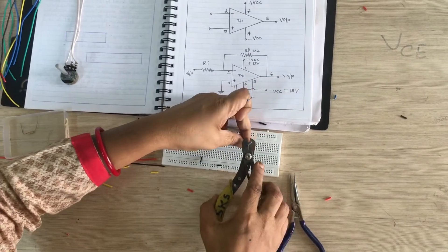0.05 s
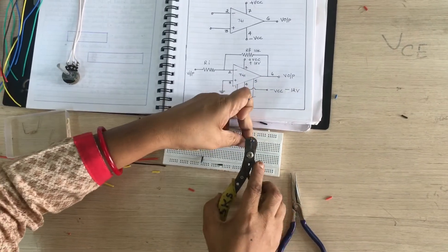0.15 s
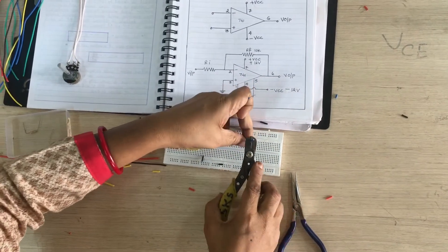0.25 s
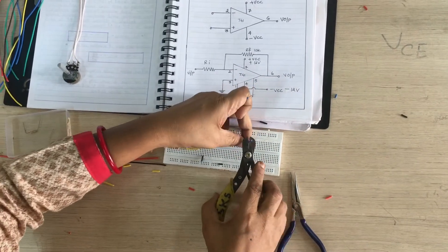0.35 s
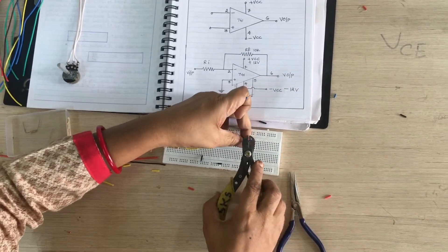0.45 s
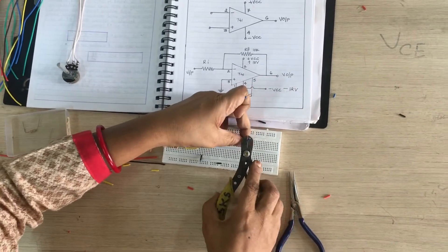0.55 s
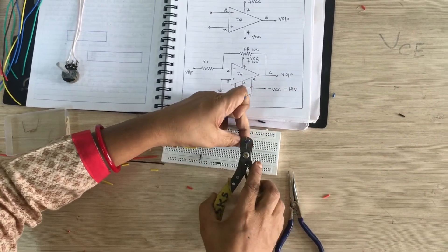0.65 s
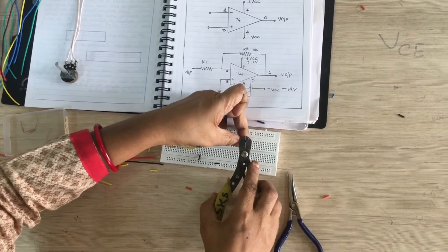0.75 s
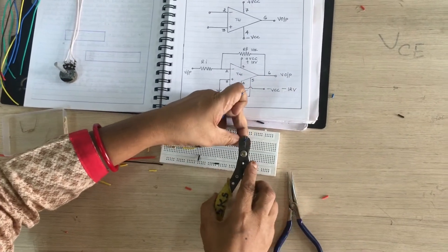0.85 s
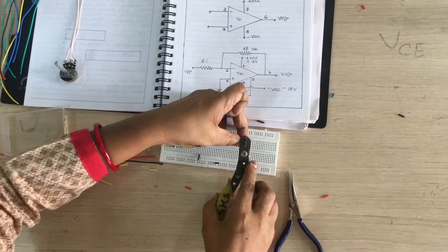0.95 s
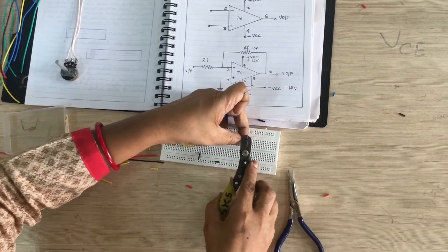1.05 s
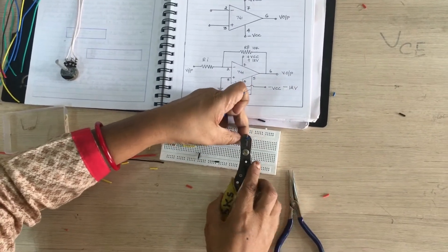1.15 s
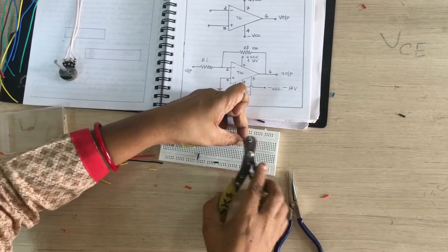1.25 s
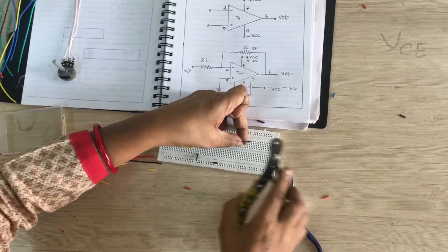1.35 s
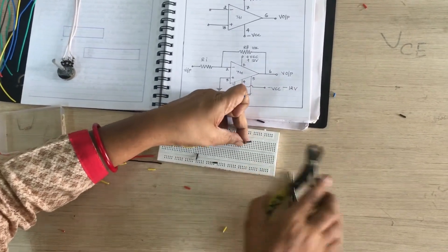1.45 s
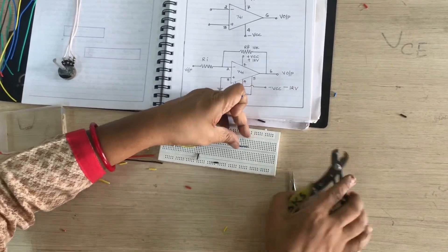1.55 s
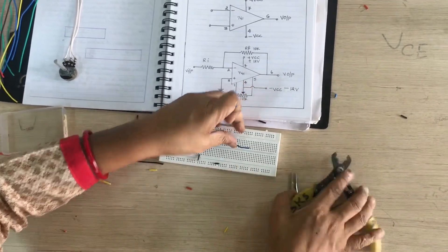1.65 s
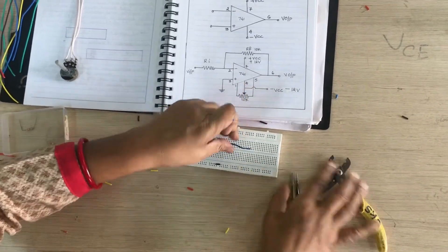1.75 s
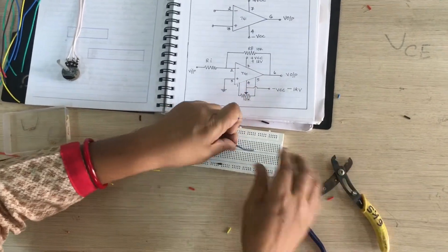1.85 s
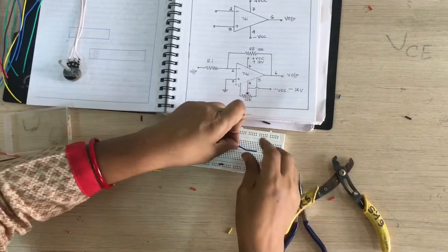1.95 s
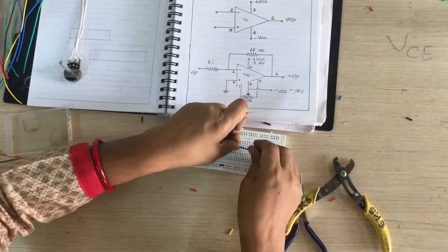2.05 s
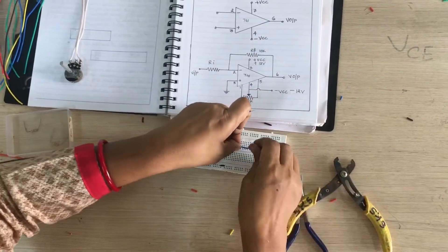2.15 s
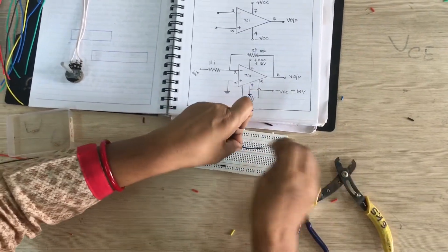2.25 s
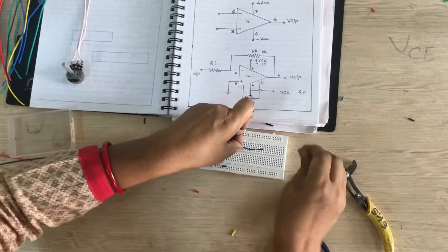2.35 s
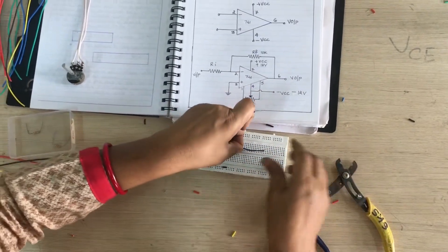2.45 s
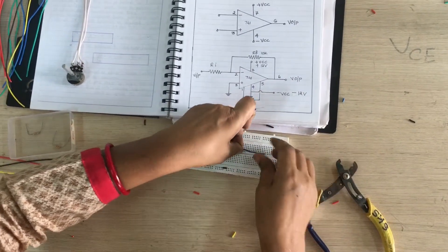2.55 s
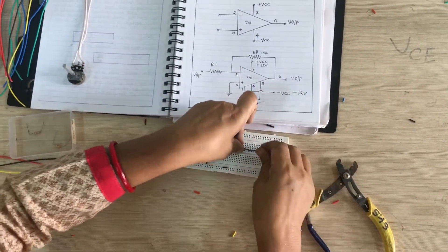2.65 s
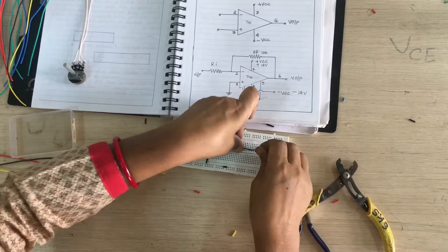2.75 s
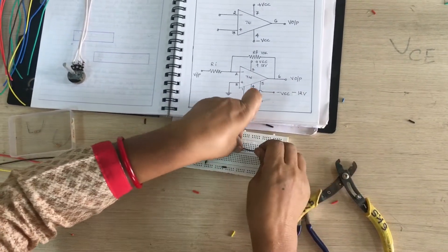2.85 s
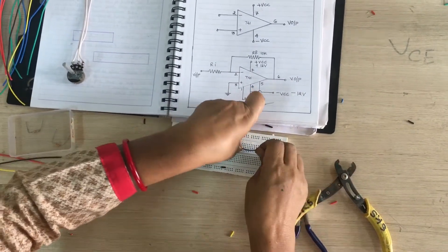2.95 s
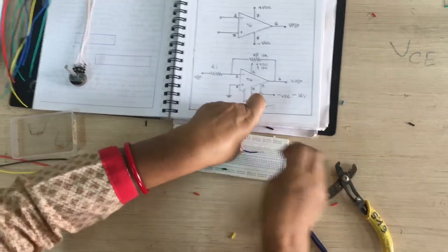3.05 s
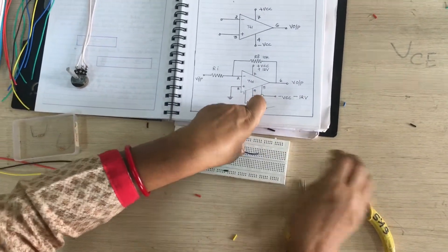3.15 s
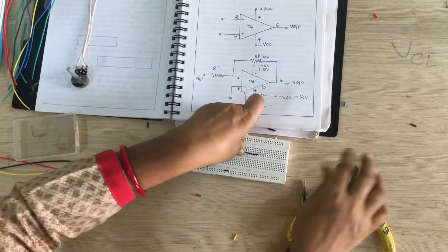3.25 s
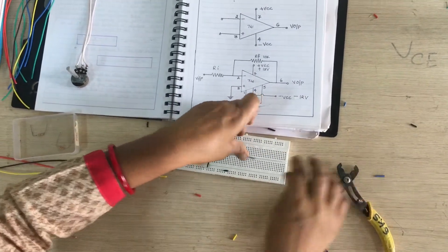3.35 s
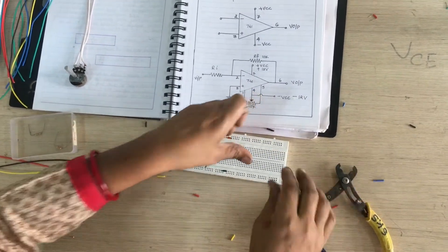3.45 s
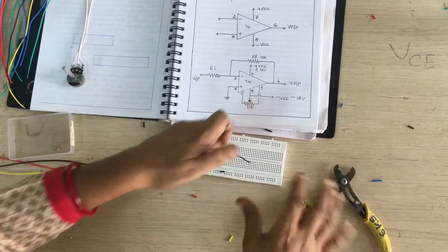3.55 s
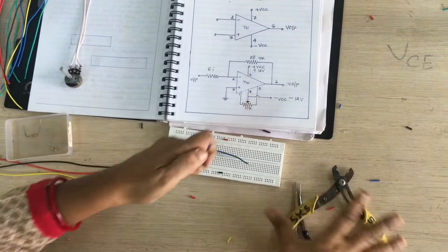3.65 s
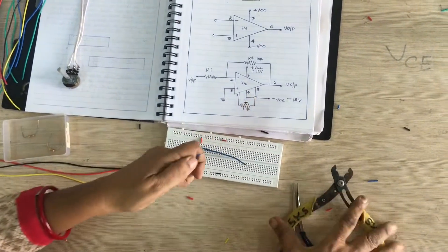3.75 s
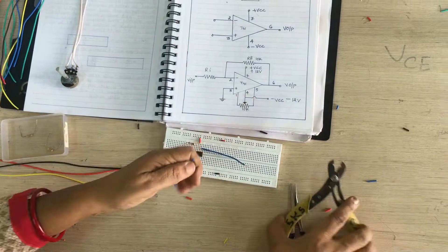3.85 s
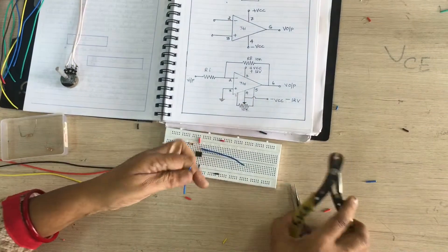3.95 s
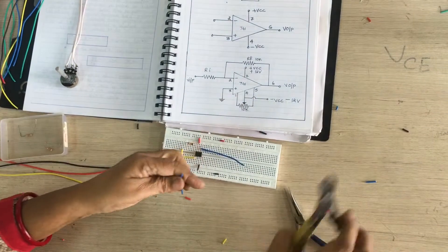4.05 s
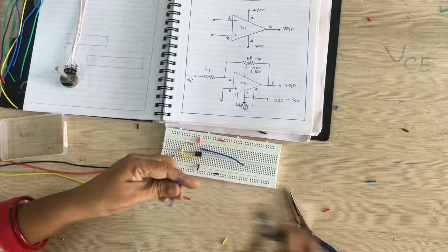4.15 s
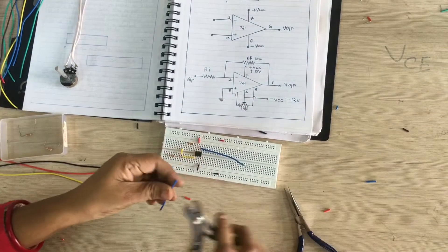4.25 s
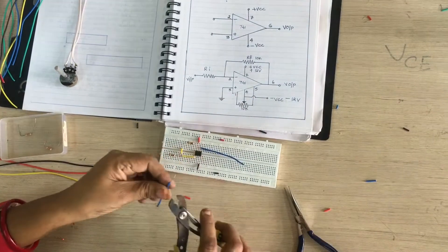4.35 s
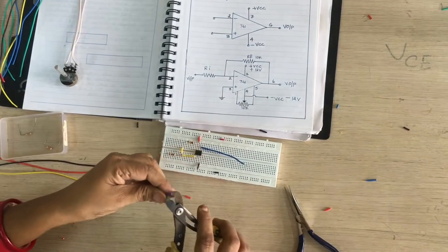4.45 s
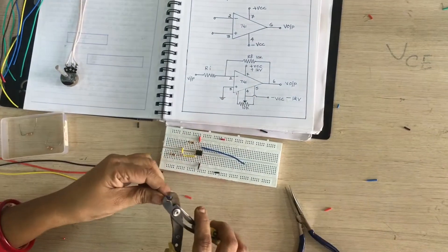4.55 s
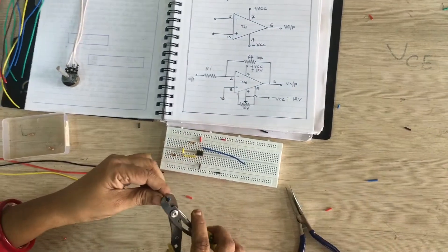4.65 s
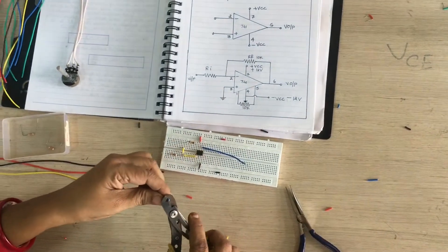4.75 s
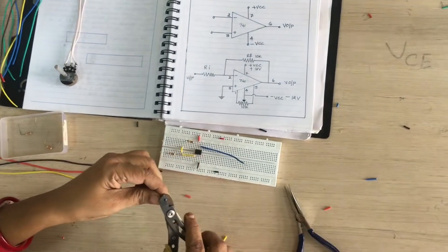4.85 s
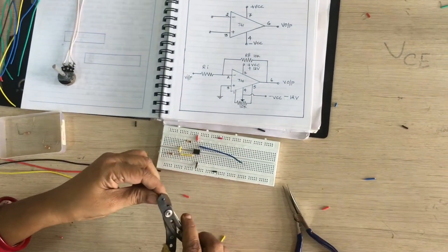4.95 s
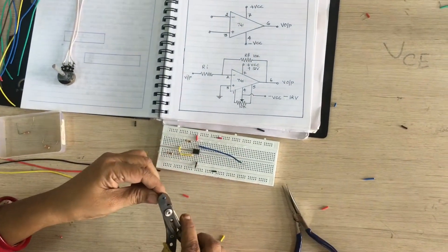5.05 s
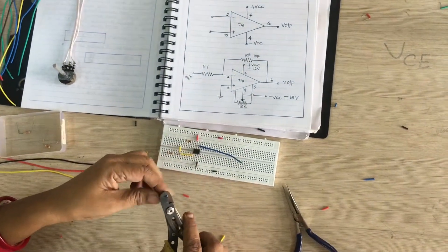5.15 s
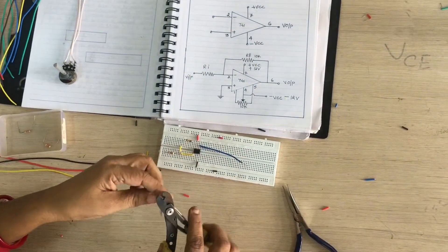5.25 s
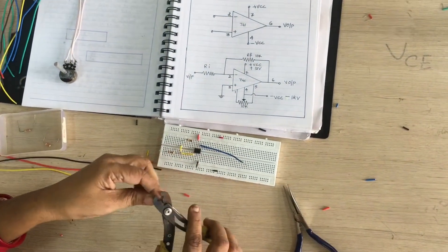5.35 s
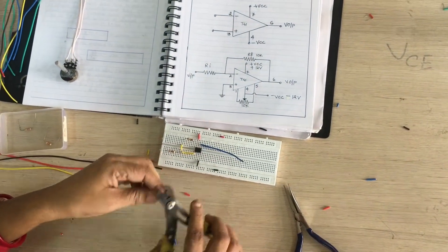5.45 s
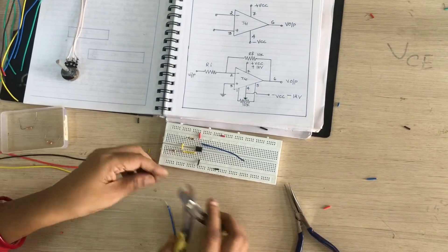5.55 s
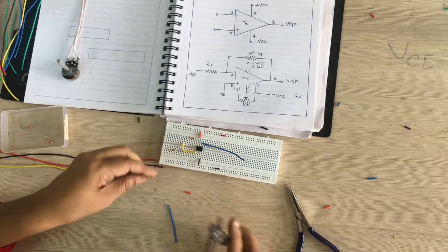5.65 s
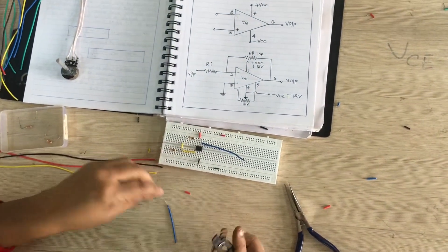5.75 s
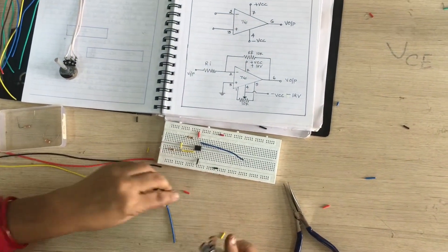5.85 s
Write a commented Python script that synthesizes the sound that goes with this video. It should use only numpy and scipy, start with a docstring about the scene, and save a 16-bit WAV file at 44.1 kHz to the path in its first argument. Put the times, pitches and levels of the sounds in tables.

```python
"""Small wire cutters at a wooden workbench in a bare, echoing room: a low steady noise-and-tone rumble runs throughout.
After faint clicks, the cutters knock down on the desk (struck panel modes) and their loose jaws rattle (steel modes).
Then a jumper wire is pressed into a breadboard with small clicks and rubs (steel modes, grainy noise).
The cutters are picked up again with soft knocks and a faint squeal (one jittering tone).
Last, a thin whine swells (wavering partials), the jaws snap through the wire, and a few clicks follow."""
import sys
import numpy as np
from scipy import signal
from scipy.fft import rfft, irfft
from scipy.io import wavfile

SR = 44100
rng = np.random.default_rng(int(sys.argv[2]) if len(sys.argv) > 2 else 0)


def store_wav(level_fs):
    """Save 16-bit WAV to argv[1]."""
    pcm = np.round(np.clip(np.atleast_2d(level_fs), -1, 1) * 32767)
    wavfile.write(sys.argv[1], SR, pcm.T.astype(np.int16))


N = 259749
TIME = np.arange(N) / SR

# spectrum shape of the low rumble: (frequency [Hz], relative density [dB per Hz])
RUMBLE_COLOUR = [(13, -51), (22, -29), (43, -25), (59, -11), (80, 1), (103, -3.5), (135, -3), (167, -8),
                 (195, -6.5), (225, -14.5), (253, -11.5), (325, -14.5), (468, -18), (500, -40), (650, -51),
                 (1100, -120)]
# spectrum shape of the faint hiss: (frequency [Hz], relative density [dB per Hz])
AIR_COLOUR = [(240, -30), (400, -4.5), (588, -3.5), (742, -3), (801, -6), (1440, -9.5), (1560, -11.5),
              (1930, -14), (2930, -23), (4310, -27.5), (4880, -31), (8760, -32.5), (10400, -36),
              (11800, -33), (16000, -38)]
RUMBLE_DB, AIR_DB = -43.5, -53.56
# hum tones about which pitch and level waver: (frequency [Hz], level [dB])
HUM_TONES = [(43, -62.5), (75.4, -53), (129.3, -58)]

# decay of the room: (frequency [Hz], reverberation time [s])
ROOM_T60 = [(100, 0.7), (700, 1.56), (1500, 1.22), (3000, 1.37), (6000, 1.05), (10000, 0.88), (12500, 0.63),
            (15500, .33)]
# balance of the diffuse tail: (frequency [Hz], relative level [dB])
ROOM_COLOUR = [(100, 12.5), (350, 11.5), (750, -2), (1200, 1), (3000, -4.5), (6000, -1.5), (12000, -3),
               (15500, -2)]
# reflections from near walls: (delay [s], level [dB])
WALL_ECHOES = [(0.0227, -15), (.054, -18)]
CUTOFF_HZ = 15800

# hands bumping the desk: (time [s], level [dB], half length [s])
BUMPS = [(1.35, -50.5, 0.12), (1.61, -36, 0.036), (1.77, -41, .075), (3.68, -42.5, 0.025),
         (3.84, -36, 0.02), (3.922, -32.5, 0.0042)]
# spectrum shape of the bumps: (frequency [Hz], relative density [dB per Hz])
BUMP_COLOUR = [(25, -24), (40, -9), (55, -8), (76, 13), (100, -6), (150, -1.5), (300, -2), (500, -12),
               (1000, -24)]
# fingers and wire sliding: (time [s], level [dB], half length [s])
RUBS = [(1.203, -65, .012), (3.094, -56.5, .0042), (3.26, -68, .02), (3.70, -68, .028),
        (3.745, -60.5, .023), (3.83, -63.5, .056), (4.022, -61, .015), (5.19, -69, .04),
        (5.851, -51, 0.0034)]
# spectrum shape of the rubs: (frequency [Hz], relative density [dB per Hz])
RUB_COLOUR = [(2000, -22), (4000, -1), (8000, 2), (15000, -1), (17000, -3.5)]

# partials of the whine: (frequency [Hz], relative level [dB])
WHINE_PARTIALS = [(2675, 0), (3010, -8), (3385, -7)]
WHINE_START_S, WHINE_DB = 5.225, -60.5
WHINE_ATTACK_S, WHINE_HOLD_S, WHINE_T60_S = 0.08, 0.11, 1.1
# faint squeal of sliding steel
SQUEAL_START_S, SQUEAL_DB, SQUEAL_HZ = 3.875, -64, 6100
SQUEAL_ATTACK_S, SQUEAL_HOLD_S, SQUEAL_T60_S = 0.016, .015, 0.29

# cutters on the desk: (time [s], level [dB], contact low-pass [Hz], favoured frequency [Hz],
# emphasis before scaling by focus [dB], room send [dB], relative level of the steel [dB])
KNOCKS = [(1.5123, -24.5, 2300, 750, 6, -3.5, -53), (1.5919, -25, 3930, 1680, 9.5, 2, -20.5),
          (1.6810, -17, 3500, 720, 9, -2, -17), (3.6447, -39.5, 1980, 1120, 7, 5.5, -28.5),
          (3.6569, -28.5, 2400, 1660, 9, 1, -23.5), (3.8705, -30, 1960, 840, 4, -2, -47)]
# modes of the desk top: (frequency [Hz], mean relative level [dB], decay time [s])
DESK_MODES = [(77.1, -23, 0.58), (194, -29, 0.1), (292, -16.5, 0.056), (423, -14, 0.034),
              (505, -11.5, 0.019), (576, -7, 0.028), (728, -0.5, 0.037), (857, -3, 0.038), (912, -2, 0.033),
              (1050, -1, 0.03), (1203, -1, 0.024), (1324, -7, 0.055), (1428, -4.5, 0.035),
              (1653, -3.5, 0.028), (1848, -8.5, 0.059), (2010, -6.5, 0.046), (2447, -3, 0.017),
              (2830, -2.5, 0.031), (2980, -7.5, 0.029), (3200, -7.5, 0.019), (3694, -4.5, 0.012),
              (4590, -7.5, 0.0062)]
# the tool rebounds once, the later the harder it lands: flight after a 0 dB blow, and its power law
FLIGHT_S, FLIGHT_POWER = .0122, .44
REBOUND_DESK_DB, REBOUND_STEEL_DB = -9.5, 1

# lone clicks of steel and wire: (time [s], relative level [dB], favoured frequency [Hz], spread [octaves])
CLICKS = [(.9338, -43, 9000, .3), (.9580, -42, 9000, 0.49), (1.087, -35, 8000, 1.7),
          (1.2253, -39, 4300, .3), (1.6344, -14.5, 9600, 0.72), (1.6655, -22.5, 9500, .4),
          (2.632, -41.5, 4370, 0.38), (3.2107, -32, 7000, 1.8), (4.032, -38, 9000, 0.56),
          (5.1135, -41, 5430, 0.36), (5.3204, -25.5, 8000, 1.5), (5.3485, -27, 2700, 0.7),
          (5.4000, -31, 6900, .4), (5.4766, -25, 6560, .3), (5.8530, -22.5, 5350, 0.15)]
SETTLE_S, SETTLE_DB = .004, -13   # each click settles with a second, weaker touch
# mean modes of steel jaws damped by the hand: (frequency [Hz], relative level [dB], decay time [s])
JAW_MODES = [(2180, -15, .006), (3290, -5, 0.036), (4350, -7.5, 0.0043), (5460, -5.5, 0.0074),
             (6410, 3.5, 0.0085), (7200, -17, 0.0017), (9150, 4.5, 0.0056), (9640, -12, 0.013),
             (10400, -16, 0.0031), (11470, -7, 0.014), (12400, -5, 0.0082), (12700, -3, 0.0061),
             (14300, -21, .004), (15500, -14, .004)]
# let go, the loose jaws rattle in ever quicker and weaker bounces
RATTLE_S, RATTLE_DB, RATTLE_HZ, RATTLE_OCTAVES = 1.7012, -28, 9700, 0.15
RATTLE_GAP_S, RATTLE_GAP_SHARE, RATTLE_LOSS_DB = 0.018, .815, 1

# two bright snaps at the cutting edges, half a millisecond apart: (time [s], relative level [dB], ringing
# frequency [Hz], its emphasis [dB])
SNIP = [(5.3462, -13.5, 12000, 11), (5.3467, -9.5, 11900, 10)]


def from_db(db):
    """The decibel law: an amplitude ratio from a level."""
    return 10 ** (np.asarray(db) / 20)


def rms_one(x):
    """Normalisation by power: scale to unit rms."""
    return x / np.sqrt(np.mean(x ** 2) + 1e-20)


def at_hz(points, hz):
    """Interpolation of a table on a logarithmic frequency axis."""
    f, value = np.transpose(points)
    return np.interp(np.log(np.maximum(hz, 1)), np.log(f), value)


def noise(colour, low_hz=20, high_hz=20000):
    """Spectral shaping: white noise weighted between two edges, at unit rms."""
    hz = np.fft.rfftfreq(N, 1 / SR)
    passed = (hz > low_hz) * (hz < high_hz)
    spectrum = rfft(rng.standard_normal(N)) * from_db(at_hz(colour, hz)) * passed
    return rms_one(irfft(spectrum, N))


def drift(rate_hz):
    """Low-pass filtered randomness: a wander of unit rms, computed at every 40th sample."""
    pole = np.exp(-80 * np.pi * rate_hz / SR)
    white = rng.standard_normal(N // 40 + 2002)
    slow = signal.lfilter([1], [1, -2 * pole, pole * pole], white)[2000:]   # skip the filter's start-up
    return np.interp(np.arange(N) / 40, np.arange(len(slow)), rms_one(slow))


def tone(hz):
    """Phase as the integral of frequency: a sine that follows a changing pitch."""
    return np.sin(2 * np.pi * np.cumsum(hz) / SR)


def add(track, s, sound):
    """Superposition: mix a sound into a track at a time."""
    start = int(round(s * SR))
    track[start:start + len(sound)] += sound[:N - start]


def fade(t, t60):
    """Exponential damping: a fall of 60 dB in the time t60."""
    return np.exp(-np.log(1000) * t / t60)


def ring(hz, gains, t60, t):
    """Modal superposition: a struck body sounds as a sum of damped sines."""
    modes = np.sin(2 * np.pi * hz[:, None] * t) * fade(t, t60[:, None])
    return gains @ modes


def bell(hz, centre_hz, octaves):
    """Selective excitation: a weight that falls away on both sides of a frequency."""
    return np.exp(-.5 * (np.log2(hz / centre_hz) / octaves) ** 2)


def burst(low_hz, high_hz, t60, t):
    """High modal density: a crowd of quickly damped modes makes a short crack of noise."""
    edges = np.clip([low_hz, high_hz], 100, .45 * SR)
    band = signal.butter(1, edges, "band", fs=SR, output="sos")
    return rms_one(signal.sosfilt(band, rng.standard_normal(len(t)))) * fade(t, t60)


def swells(rows):
    """Gradual excitation: an envelope of soft bell-shaped strokes."""
    return sum(from_db(db) * np.exp(-.5 * ((TIME - s) / half) ** 2) for s, db, half in rows)


def envelope(start_s, attack_s, hold_s, t60):
    """Build-up and decay: straight rise, hold, exponential release."""
    age = TIME - start_s
    return np.clip(age / attack_s, 0, 1) * fade(np.maximum(age - attack_s - hold_s, 0), t60)


def background(hum_waver_db=3, hum_waver_hz=1.324):
    """Stationary noise and tonal sources: low rumble, faint hiss and an unsteady hum, as of a fan."""
    rumble = from_db(RUMBLE_DB) * noise(RUMBLE_COLOUR, low_hz=29, high_hz=480)
    air = from_db(AIR_DB) * noise(AIR_COLOUR, low_hz=480)
    hum = np.zeros(N)
    for hz, db in HUM_TONES:
        level = from_db(db + hum_waver_db * drift(3.0))
        hum += level * tone(hz + hum_waver_hz * drift(3.83))
    return rumble + air + np.sqrt(2) * hum


def room(x, build_up_s=0.0034, early_db=4, early_s=0.072, tail_db=-37):
    """Reverberation: two wall echoes and a diffuse tail whose middle range lasts longest."""
    t = TIME[:3 * SR // 2]
    white = rng.standard_normal((2, len(t)))
    edges = np.geomspace(50, 18000, 24)
    response = np.zeros(len(t))
    for k, (low, high) in enumerate(zip(edges, edges[1:])):
        band_filter = signal.butter(2, [low, high], "band", fs=SR, output="sos")
        band = signal.sosfilt(band_filter, white[k % 2])
        hz = np.sqrt(low * high)
        response += band * from_db(at_hz(ROOM_COLOUR, hz)) * fade(t, at_hz(ROOM_T60, hz))
    # the tail builds up as sound reaches the walls; its early part is raised
    response *= from_db(tail_db + early_db * np.exp(-t / early_s))
    response *= 1 - np.exp(-(t / build_up_s) ** 2)
    for delay_s, db in WALL_ECHOES:
        response[int(delay_s * SR)] += from_db(db)
    return signal.fftconvolve(x, response)[:N]


def bumps():
    """Soft impact: hands on the desk excite dull low-frequency thuds."""
    return swells(BUMPS) * noise(BUMP_COLOUR, high_hz=1150)


def rubs(grain_db=2, grain_rate_hz=500):
    """Friction: skin and insulation slide in tiny uneven slips."""
    grain = from_db(grain_db * drift(grain_rate_hz))
    return swells(RUBS) * rms_one(noise(RUB_COLOUR, low_hz=1500) * grain)


def whine(waver_db=4.5, waver_hz=6):
    """Random modulation: a few faint wavering partials swell, hold and die away."""
    level = from_db(WHINE_DB) * envelope(WHINE_START_S, WHINE_ATTACK_S, WHINE_HOLD_S, WHINE_T60_S)
    partials = np.zeros(N)
    for hz, db in WHINE_PARTIALS:
        gain = from_db(db + waver_db * drift(22))
        partials += gain * tone(hz + waver_hz * drift(17))
    return np.sqrt(2) * level * partials


def squeal(jitter_hz=200):
    """Random frequency modulation: an unsteady thin tone as the tool is lifted."""
    pitch = SQUEAL_HZ + jitter_hz * drift(207)
    level = from_db(SQUEAL_DB) * envelope(SQUEAL_START_S, SQUEAL_ATTACK_S, SQUEAL_HOLD_S, SQUEAL_T60_S)
    return np.sqrt(2) * level * tone(pitch)


def rattle(count=4):
    """Lossy bouncing: each bounce of the loose jaws is weaker and each gap shorter than the last."""
    rows, s = [], RATTLE_S
    for k in range(count):
        rows.append((s, RATTLE_DB - RATTLE_LOSS_DB * k, RATTLE_HZ, RATTLE_OCTAVES))
        s += RATTLE_GAP_S * RATTLE_GAP_SHARE ** k
    return rows


def blows():
    """Ballistic rebound: every knock lands a second time; rows in the columns of KNOCKS."""
    rows = []
    for s, db, *contact, steel_db in KNOCKS:
        flight_s = FLIGHT_S * from_db(db) ** FLIGHT_POWER
        rows.append((s, db, *contact, steel_db))
        rows.append((s + flight_s, db + REBOUND_DESK_DB, *contact, steel_db + REBOUND_STEEL_DB))
    return rows


def touches(landing_hz=10300, landing_octaves=1.5):
    """Impact excitation of the steel: clicks and their settling, blows on the desk, the rattle."""
    settling = [(s + SETTLE_S, db + SETTLE_DB, hz, spread) for s, db, hz, spread in CLICKS]
    landings = [(s, steel_db, landing_hz, landing_octaves) for s, *_, steel_db in blows()]
    return list(CLICKS) + settling + landings + rattle()


def jaw_ring(weights, t, scatter_db=10.5, detune=.02):
    """Boundary conditions set the modes: grip and opening shift them a little at each blow."""
    hz, level_db, t60 = np.transpose(JAW_MODES)
    gains = weights * from_db(level_db + scatter_db * rng.standard_normal(len(hz)))
    gains = gains * rng.choice([-1, 1], len(hz)) / np.linalg.norm(gains)
    shifted = hz * (1 + detune * rng.standard_normal(len(hz)))
    return ring(shifted, gains, t60, t)


def steel_clicks(crack_db=-5, crack_t60=0.0091, skirt=0.027):
    """Damped modal response: each touch briefly rings the jaws in the range its contact favours."""
    hz, t, out = np.array(JAW_MODES)[:, 0], TIME[:SR // 20], np.zeros(N)
    for s, db, favoured_hz, spread in touches():
        # the skirt lets modes far from the favoured range sound a little
        body = jaw_ring(skirt + bell(hz, favoured_hz, spread), t, detune=0.024)
        width = 2 ** spread
        crack = from_db(crack_db) * burst(favoured_hz / width, favoured_hz * width, crack_t60, t)
        add(out, s, .5 * from_db(db) * (body + crack))
    return out


def desk_knocks(focus, scatter_db=2.5, favour_width=0.083,
                crack_db=-11, crack_t60=0.053, crack_low_hz=1000, crack_high_hz=3600):
    """Modal excitation of a panel by impact; returns the near sound and what goes into the room."""
    hz, level_db, t60 = np.transpose(DESK_MODES)
    t = TIME[:SR // 2]
    signs = (-1) ** np.arange(len(hz))
    near, sent = np.zeros(N), np.zeros(N)
    for s, db, contact_hz, favoured_hz, emphasis_db, send_db, _ in blows():
        # where the blow lands sets which panel modes ring most
        favour_db = focus * emphasis_db * bell(hz, favoured_hz, favour_width)
        gains = from_db(level_db + favour_db + scatter_db * rng.standard_normal(len(hz)))
        body = ring(hz, gains * signs, t60, t)
        crack = from_db(crack_db) * burst(crack_low_hz, crack_high_hz, crack_t60, t)
        contact = signal.butter(2, contact_hz, fs=SR, output="sos")
        knock = from_db(db) * signal.sosfilt(contact, body + crack)
        add(near, s, knock)
        add(sent, s, knock * from_db(send_db))
    return near, sent


def snip(ring_width=.15, low_cut_hz=4000,
         crack_db=-8, crack_t60=0.0048, crack_low_hz=7500, crack_high_hz=13000):
    """Impulsive excitation at the cutting edges: two hard, bright snaps half a millisecond apart."""
    hz, t, out = np.array(JAW_MODES)[:, 0], TIME[:SR // 20], np.zeros(N)
    # a snap at the very tips barely moves the low modes
    tips = 1 / np.hypot(1, (low_cut_hz / hz) ** 2)
    for s, db, ring_hz, emphasis_db in SNIP:
        weights = tips * from_db(emphasis_db * bell(hz, ring_hz, ring_width))
        body = jaw_ring(weights, t, scatter_db=1.2, detune=.015)
        crack = from_db(crack_db) * burst(crack_low_hz, crack_high_hz, crack_t60, t)
        add(out, s, .5 * from_db(db) * (body + crack))
    return out


def scene(steel_send_db=-12):
    """Radiation by size: the broad desk top feeds the room more than the small jaws do."""
    knocks, knocks_sent = desk_knocks(focus=1.1)
    steel = steel_clicks() + rubs() + squeal()
    cut = snip()
    upward = from_db(-5.5) * knocks_sent
    upward += from_db(steel_send_db) * steel
    upward += from_db(-7.5) * cut
    # each blow radiates another, more even mix of modes sideways, which fills in the tail
    _, side_knocks = desk_knocks(focus=0.28, crack_db=-6.5, crack_low_hz=1000, crack_high_hz=2520)
    side_cut = snip(low_cut_hz=8000, crack_db=-1, crack_low_hz=9000, crack_high_hz=13000)
    sideways = from_db(-0.7) * side_knocks
    sideways += from_db(steel_send_db) * steel_clicks()
    sideways += from_db(-9.5) * side_cut
    direct = knocks + steel + cut
    reverberant = room(upward) + room(sideways)
    return (direct + reverberant + bumps() + whine() + background())[None]


def record(dry):
    """Low-pass filtering: the top is cut steeply."""
    return signal.sosfilt(signal.ellip(14, .1, 90, CUTOFF_HZ, fs=SR, output="sos"), dry)


dry = scene()
out = record(dry)
store_wav(out)
```